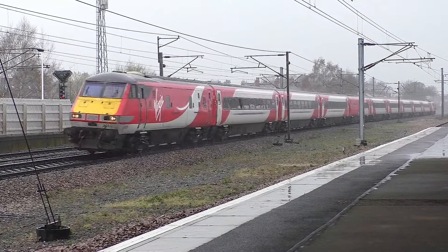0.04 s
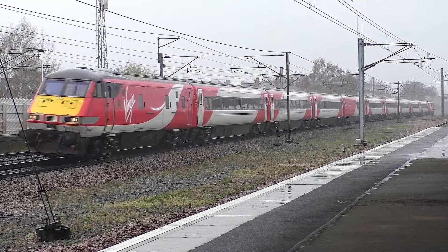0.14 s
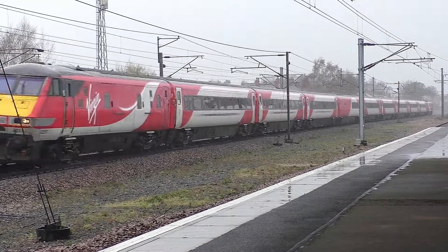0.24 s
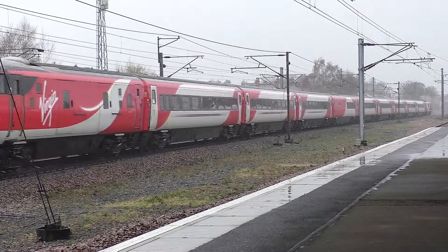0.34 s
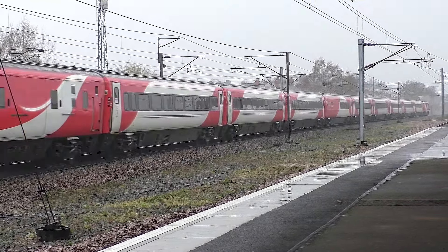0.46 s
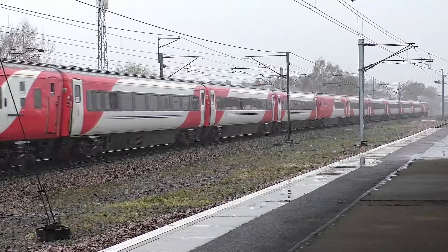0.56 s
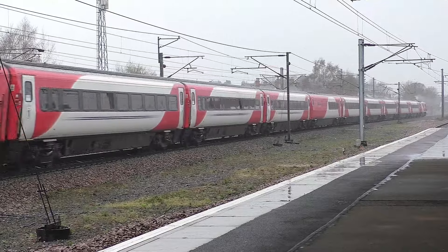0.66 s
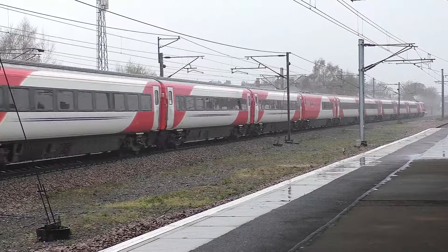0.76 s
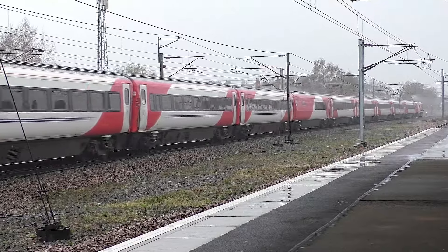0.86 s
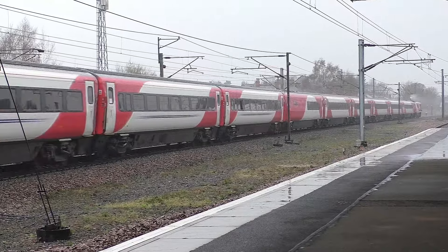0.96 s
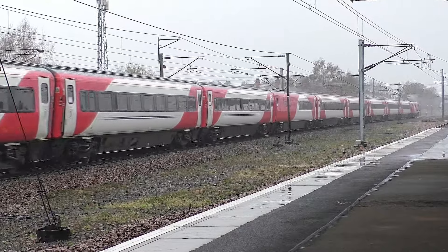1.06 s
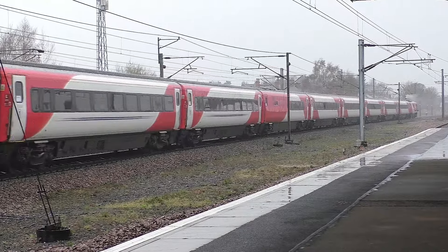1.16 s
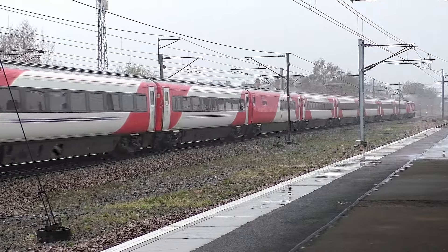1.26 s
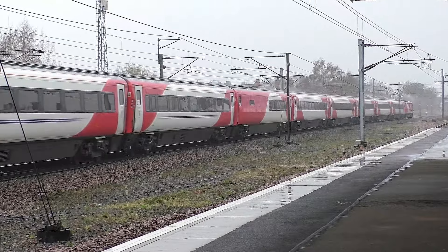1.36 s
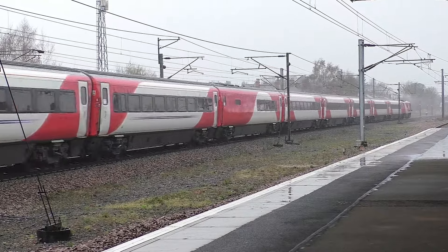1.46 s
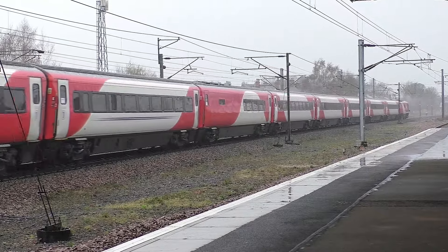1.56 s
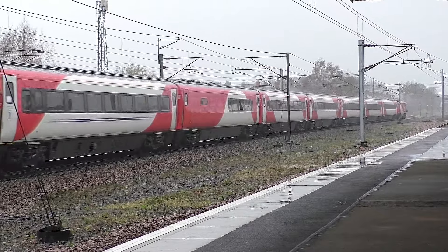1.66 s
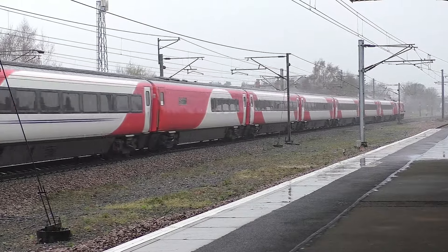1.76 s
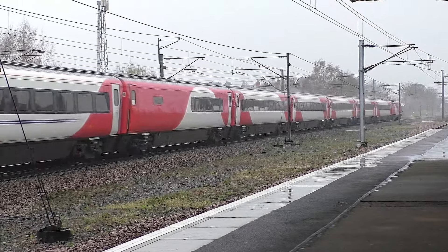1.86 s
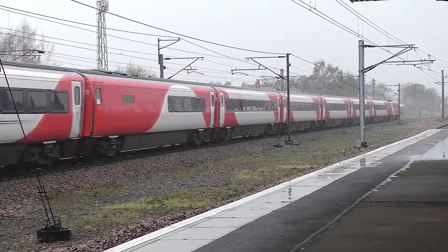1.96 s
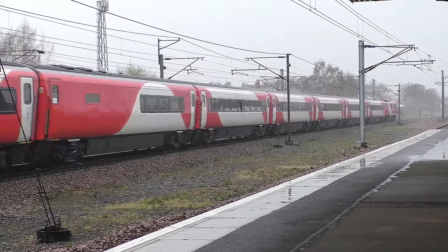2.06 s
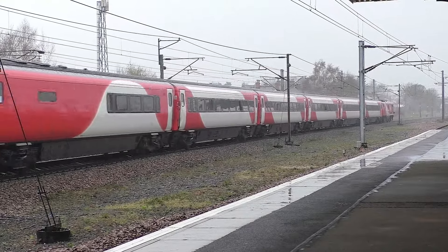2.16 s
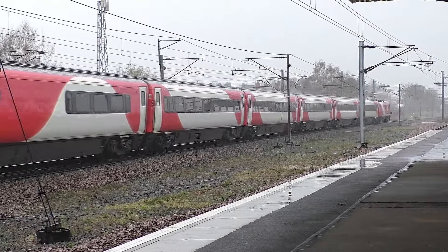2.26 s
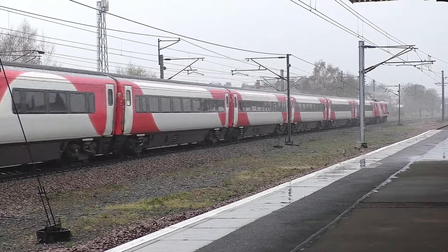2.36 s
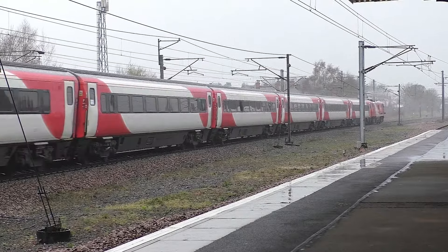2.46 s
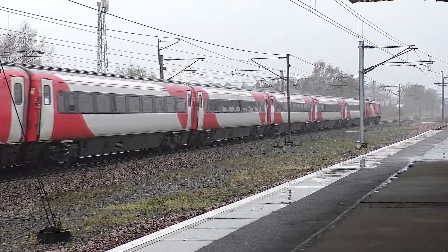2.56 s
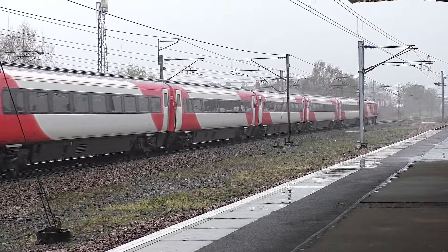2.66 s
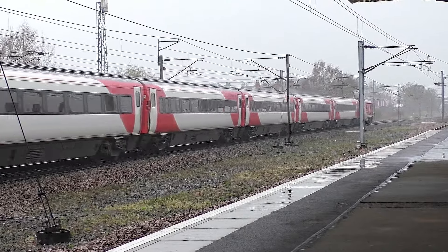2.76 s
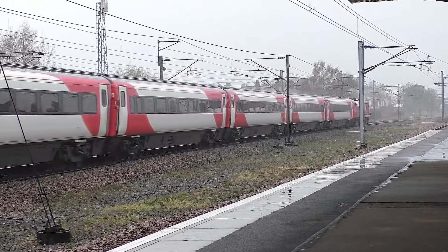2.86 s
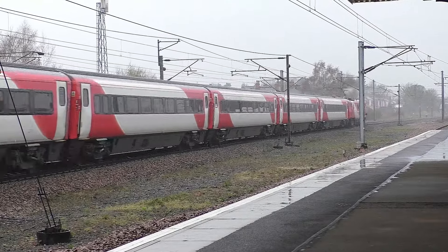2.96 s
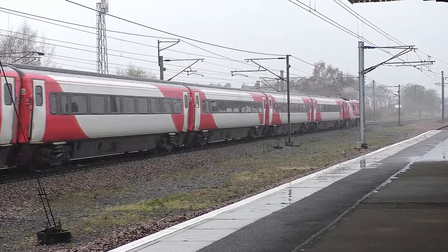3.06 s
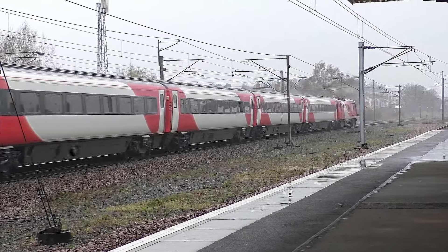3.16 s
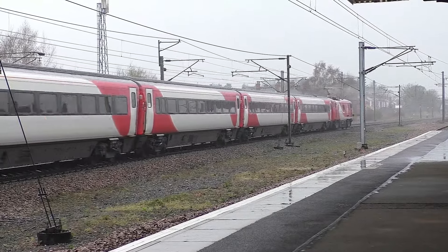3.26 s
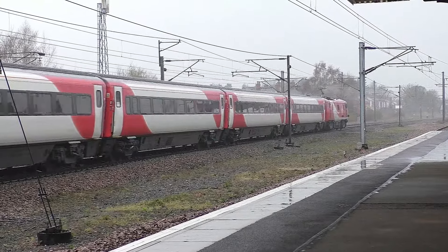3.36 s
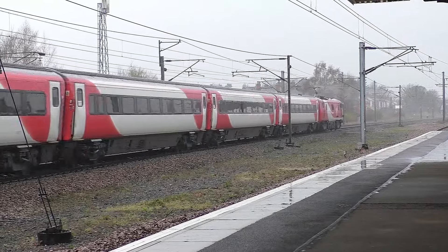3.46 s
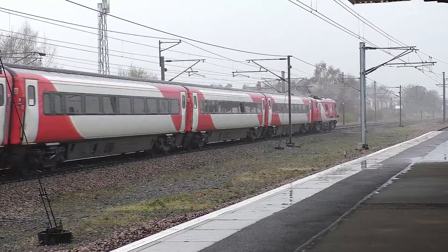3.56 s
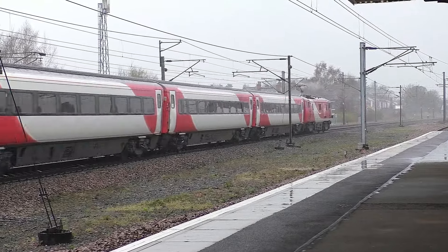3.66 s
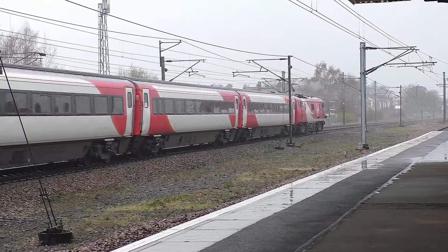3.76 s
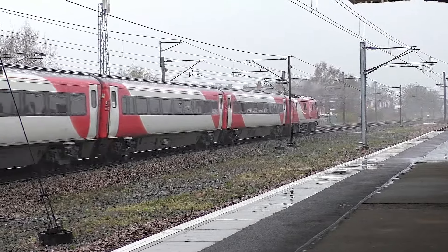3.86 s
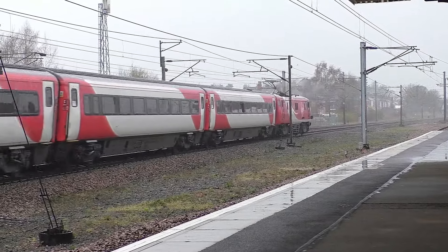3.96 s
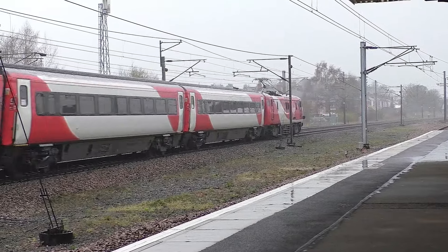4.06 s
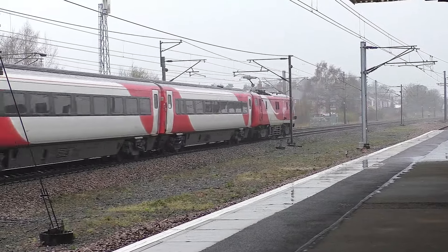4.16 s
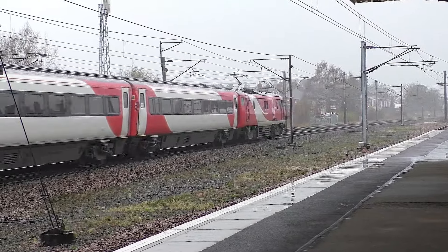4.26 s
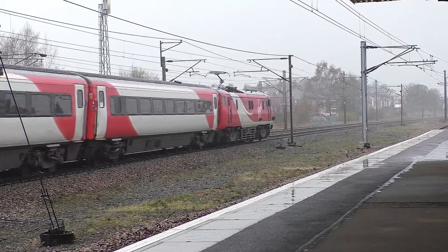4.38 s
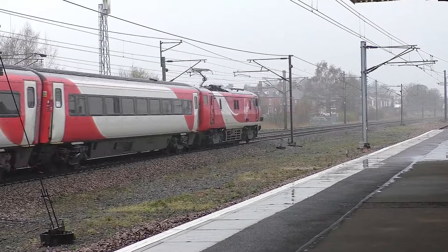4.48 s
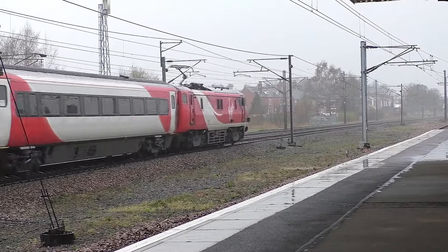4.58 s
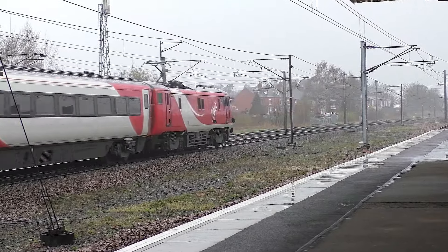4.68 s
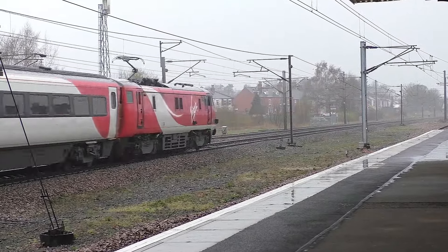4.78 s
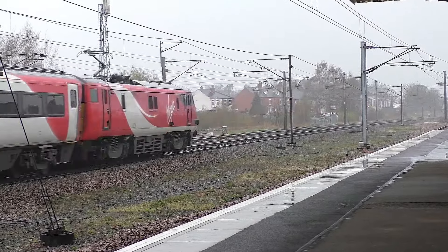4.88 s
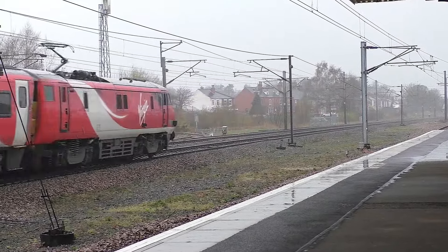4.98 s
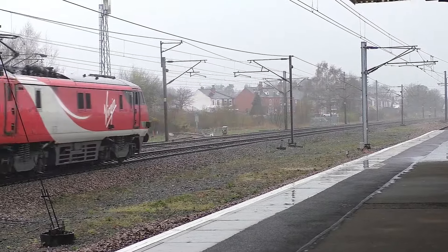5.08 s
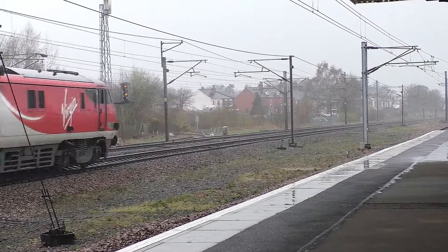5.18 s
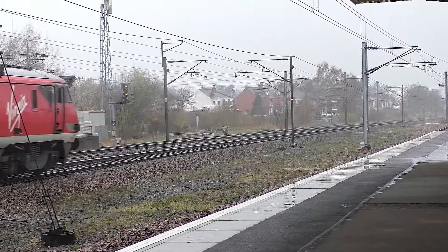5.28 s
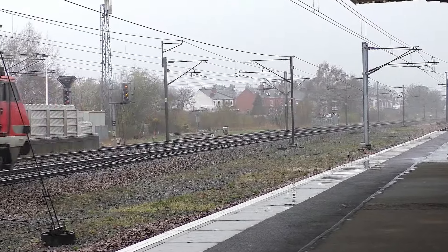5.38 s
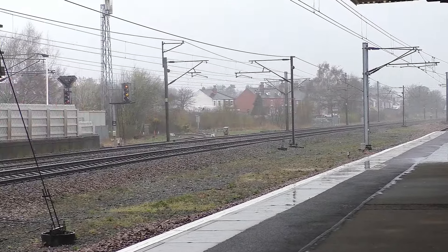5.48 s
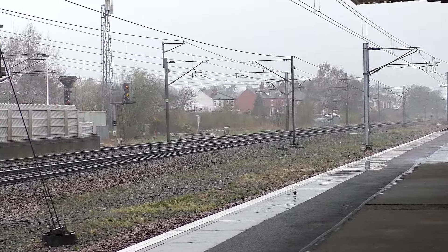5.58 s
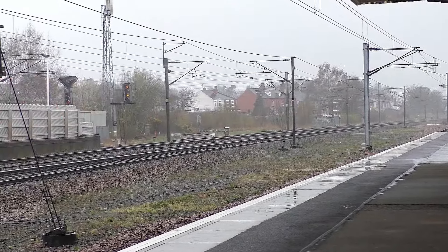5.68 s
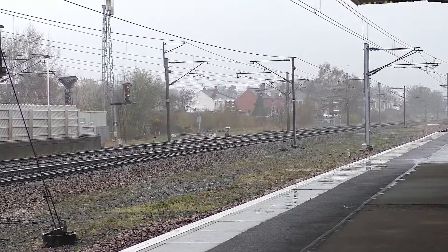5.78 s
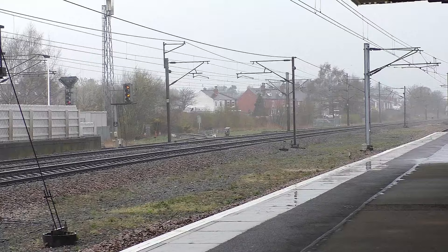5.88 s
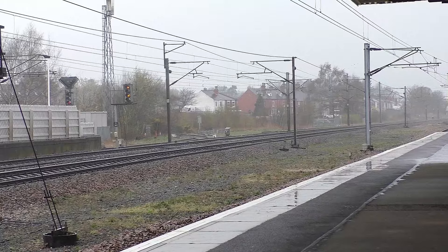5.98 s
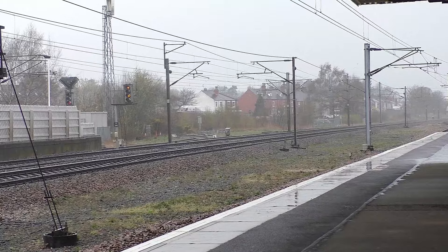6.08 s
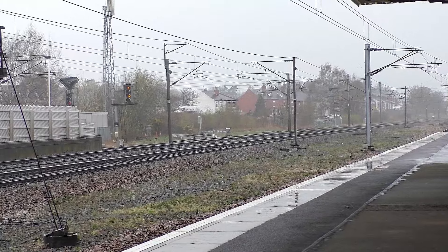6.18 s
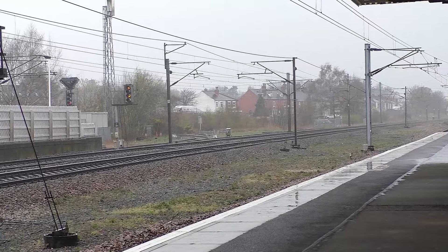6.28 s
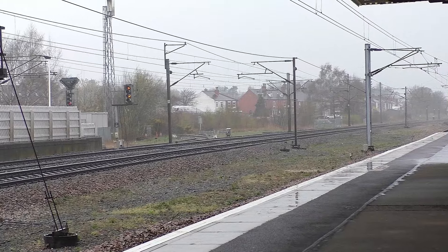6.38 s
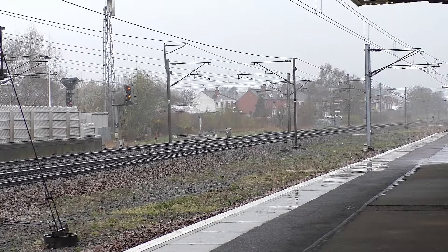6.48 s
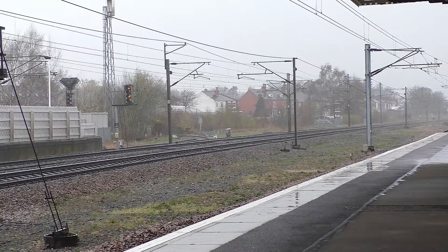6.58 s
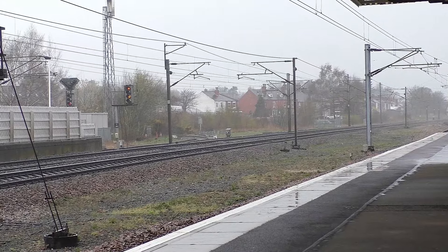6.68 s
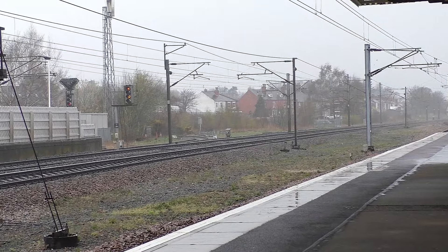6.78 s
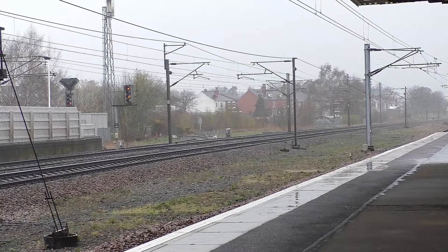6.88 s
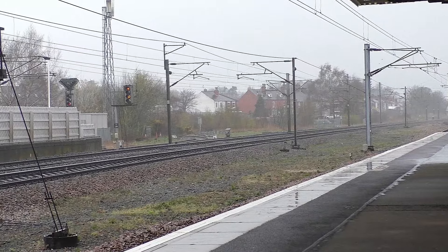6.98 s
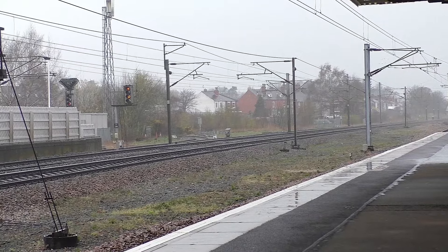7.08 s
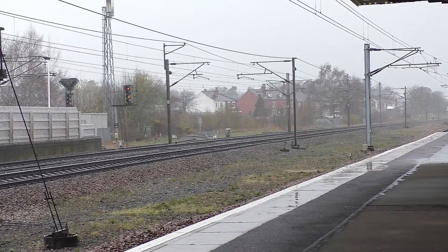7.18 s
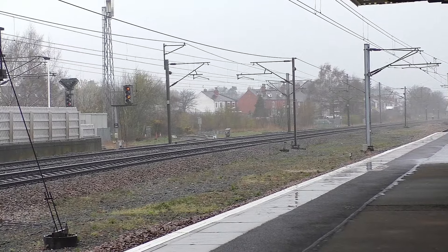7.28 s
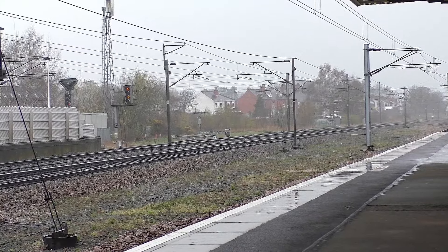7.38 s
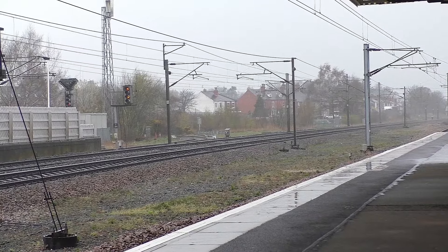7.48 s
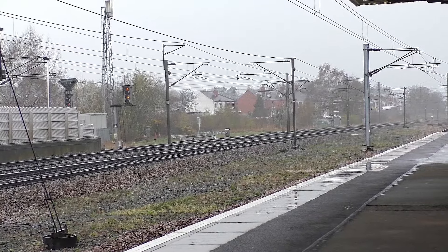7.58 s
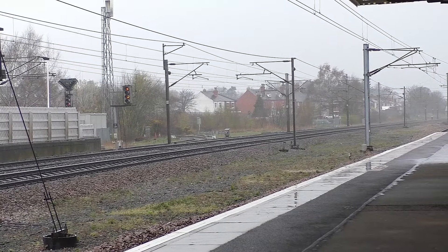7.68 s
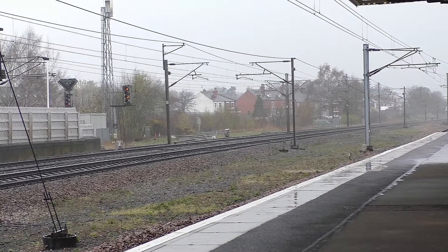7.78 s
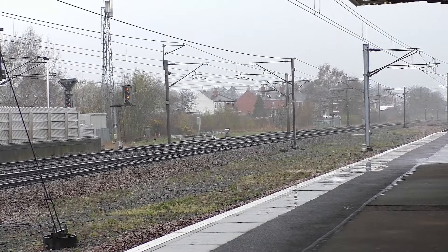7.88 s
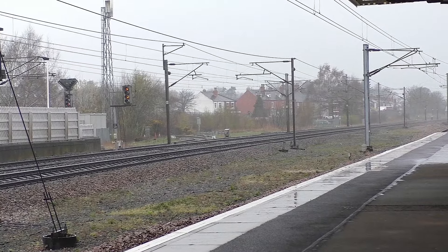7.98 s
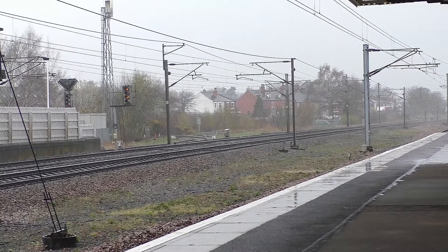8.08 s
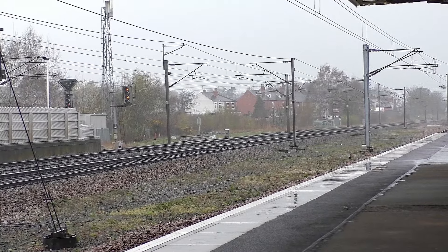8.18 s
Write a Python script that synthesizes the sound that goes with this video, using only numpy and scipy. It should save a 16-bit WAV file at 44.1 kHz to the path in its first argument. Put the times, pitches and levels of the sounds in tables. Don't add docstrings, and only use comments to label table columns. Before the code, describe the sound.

Outdoors at a rainy station, an express passes about twenty metres from a small camera with two close microphones. Rising hum and whine swell within a second into a dense, flickering roar with wet hiss. Uneven waves of ringing wheels sweep by, each sliding downward. After more than five seconds the rear locomotive goes by, a short scratchy squeak sounds above it, and the noise falls to a receding hum and faint microphone hiss.

```python
import sys
import numpy as np
from scipy import signal
from scipy.fft import rfft, irfft, next_fast_len
from scipy.io import wavfile
from scipy.ndimage import uniform_filter1d

SR = 44100
rng = np.random.default_rng(int(sys.argv[2]) if len(sys.argv) > 2 else 0)


def decibels_to_gain(level_db):
    exponent = np.asarray(level_db, float) / 20
    return 10 ** exponent


def persist_wave(psi):
    counts = np.round(np.clip(psi, -1, 1) * 32767).astype(np.int16)
    wavfile.write(sys.argv[1], SR, np.atleast_2d(counts).T)


N = 363455
T = np.arange(N) / SR
M = next_fast_len(N + N // 3)
HZ = np.fft.rfftfreq(M, 1 / SR) + 1e-3
SPEED_M_S, TRACK_M, SOUND_M_S = 46., 21., 343.

# from_wheels_db, from_air_db, locomotive_db, far_ahead_db, far_behind_db
UNDERFRAME = [
    (-67, -47.5, -61, 0, -10),
    (-39, -27.5, -26, -1.5, -6),
    (-26.5, -24.5, -19, 1.55, -5.5),
]


def read(table, column=1):
    rows = np.array(table, float)
    return np.interp(np.log(HZ), np.log(np.maximum(rows[:, 0], 1)), rows[:, column])


def unit(shape):
    return shape / np.sqrt(np.sum(shape ** 2))


def noise(shape):
    real, imaginary = rng.standard_normal((2, 2, len(HZ)))
    return irfft((real + 1j * imaginary) * shape, M) * M / 2


def mode(hz, width_hz):
    return unit(1 / (1 + np.abs(2 * (HZ - hz) / width_hz) ** 3))


def walk(rate_hz):
    hold = int(SR / rate_hz)
    held = np.repeat(rng.standard_normal(400), hold)[:N]
    return 0.77 * uniform_filter1d(uniform_filter1d(held, hold), hold)


def along_track(abreast_s, t):
    since = t - abreast_s
    slow = 1 - (SPEED_M_S / SOUND_M_S) ** 2
    sent = (since - np.sqrt(since ** 2 * (1 - slow) + slow * (TRACK_M / SOUND_M_S) ** 2)) / slow
    near = TRACK_M / np.hypot(SPEED_M_S * sent, TRACK_M)
    return sent, near, SPEED_M_S * sent * near / TRACK_M


def train_gain(layers):
    # abreast_s, wheel_roughness_db, body_air_db
    vehicles = [(.61, -3.5, 3.5), (1.22, 0.3, -3), (1.679, 2.3, -8), (2.14, 0.7, -8), (2.65, -3.5, -8),
                (3.11, 3, -7), (3.59, -1.5, -19), (4.09, 0.3, -4), (4.43, 1.1, -12.5), (5.029, .4, -4.5),
                (5.45, -2.5, -7)]
    loco_s, beam = 5.787, 1.09
    wheel_db, air_db, loco_db, ahead_db, behind_db = np.array(layers).T[:, :, None]
    sources = [(s, decibels_to_gain(wheel_db + rough) ** 2 + decibels_to_gain(air_db + air) ** 2) for s, rough, air in vehicles]
    sources.append((loco_s, decibels_to_gain(loco_db) ** 2))
    coarse = T[::64]
    power = 0
    for abreast_s, strength in sources:
        _, near, bearing = along_track(abreast_s, coarse)
        far = decibels_to_gain(ahead_db * (1.5 - bearing) + behind_db * (1 + bearing))
        power = power + strength * near ** 2 * (near ** (2 * beam) + far)
    return [np.interp(T, coarse, np.sqrt(p)) for p in power]


def rush(layers, centres_hz, first, colour, flicker_db, rate_hz):
    out = 0
    for k, gain in enumerate(train_gain(layers)):
        share = np.interp(np.log(HZ), np.log(centres_hz), np.arange(len(centres_hz)) == k + first)
        shape = decibels_to_gain(read(colour)) * np.sin(np.pi / 2 * share)
        region = noise(unit(shape))[:, :N]
        out = out + region * gain * decibels_to_gain(flicker_db * walk(rate_hz))
    return out


def passing(pair, abreast_s, sideways, ahead_db, reach_s=np.inf):
    heard = np.abs(T - abreast_s) < reach_s
    sent, near, bearing = along_track(abreast_s, T[heard])
    gain = near ** (1 + sideways) * decibels_to_gain(-ahead_db * bearing)
    place = (sent - sent[0]) * SR
    out = np.zeros((2, N))
    out[:, heard] = gain * np.array([np.interp(place, np.arange(M), x) for x in pair])
    return out


def underframe_roar():
    centres = [100, 300, 760, 1300]
    # hz, density_db_per_hz
    lows = [(15, -77), (25, -32), (147, -22.5), (269, -13), (409, -8), (445, -8), (690, 1), (803, 2.5),
            (1310, -2), (1400, -9), (1820, -39), (3080, -120)]
    return rush(UNDERFRAME, centres, first=0, colour=lows, flicker_db=1.58, rate_hz=9.)


def sleepers():
    return noise(mode(84, 10.0))[:, :N] * train_gain(UNDERFRAME)[0] * decibels_to_gain(-7)


def rush_and_spray():
    centres = [760, 1300, 2300, 3200, 5500, 12000]
    # hz, density_db_per_hz
    highs = [(500, -25), (807, 2), (1340, -1), (1630, -1), (2000, -6), (2300, -5), (3200, -11), (4200, -17),
             (5500, -19), (7500, -25), (9500, -29), (12300, -22.5), (14200, -32.5), (15700, -36)]
    # from_wheels_db, from_air_db, locomotive_db, far_ahead_db, far_behind_db
    layers = [
        (-29, -29, -21, 1, -4.5),
        (-19.5, -49, -22, -4, -15),
        (-25.5, -30, -30, -8.5, -14),
        (-30, -35, -27, -2.5, -20.5),
        (-45.5, -46, -44.5, -9, -23),
    ]
    return rush(layers, centres, first=1, colour=highs, flicker_db=1.5, rate_hz=12.)


def drones():
    # abreast_s, rest_hz, width_hz, level_db, ahead_over_abreast_db
    carrying = [(0.899, 523, 200, -26.5, 16.5), (5.4, 1700, 70, -42.5, -11), (5.4, 2230, 220, -40.5, -16),
                (5.4, 2780, 300, -41, -10), (5.5, 8200, 450, -66, -20), (5.75, 540, 248, -25, -0.5),
                (5.6, 934, 120, -26.5, -1.5)]
    # abreast_s, rest_hz, width_hz, level_db
    whines = [(1.4, 1630, 88, -29.5), (1.25, 2246, 230, -30), (1.45, 2740, 130, -35)]
    # abreast_s, rest_hz, width_hz, level_db
    rough_rail = (3, 860, 130, -26.5)
    notes = [(*row, .3) for row in carrying]
    notes += [(*row, 18, .8) for row in whines]
    notes.append((*rough_rail, .1, 8))
    out = 0
    for abreast_s, hz, width_hz, db, ahead_db, beam in notes:
        out = out + decibels_to_gain(db) * passing(noise(mode(hz, width_hz)), abreast_s, beam, ahead_db)
    return out


def wheels():
    # rest_hz, width_hz
    mode_groups = [
        [(1670, 180)],
        [(2290, 190)],
        [(3000, 260)],
        [(4780, 190), (5480, 240)],
    ]
    # abreast_s, web_db, rim_db, tread_db, upper_pair_db
    bogies = [(0.749, -47, -45, -39, -40), (1.3, -35, -23, -29, -42), (1.751, -40, -25.5, -30, -42),
              (2.3, -21.5, -25, -35, -37), (2.751, -24, -25.5, -34, -35), (3.15, -20.5, -19, -23.5, -31.5),
              (3.7, -22.5, -24, -31, -33.5), (4.3, -23.5, -31, -32, -33.5), (4.701, -30, -31, -30, -37),
              (5.15, -22, -24, -31, -36), (5.449, -23.5, -47, -40, -38)]
    beams = [4.9, 2.8, 4.2, 8.4]
    out = 0
    for k, group in enumerate(mode_groups):
        ring = noise(sum(mode(hz, width_hz) for hz, width_hz in group))
        for abreast_s, *levels_db in bogies:
            own = np.roll(ring, rng.integers(M), axis=1)
            out = out + decibels_to_gain(levels_db[k]) * passing(own, abreast_s, beams[k], 0, reach_s=1.5)
    return out


def pantograph():
    # time_s, pitch_hz, level_db
    squeak = [
        (5.735, 7430, -60),
        (5.752, 7350, -30),
        (5.77, 7280, -32),
        (5.795, 6980, -23),
        (5.825, 7050, -55),
    ]
    s, hz, db = np.transpose(squeak)
    flutter = noise(mode(30., 120.0))[:, :N]
    tone = np.sin(2 * np.pi * np.cumsum(np.interp(T, s, hz)) / SR)
    return np.sqrt(2) * tone * (1.1 + 0.87 * flutter) * decibels_to_gain(np.interp(T, s, db, -120, -120))


def ports(pair, blend_s=0.14):
    # hz, ahead_rad, abreast_rad, behind_rad
    lead = [(60, 0, 0, 0), (340, .1, 0, 0), (1290, .6, 1, .45), (1890, .85, .8, .4), (2700, .5, 0, .35),
            (4100, .7, .2, .3), (6200, 1.45, 1.2, .45), (7700, 2.2, 1.1, 1), (9200, 3.2, 3.2, 2.9),
            (11500, 3.3, 3.4, 3), (13400, 3.8, 6.3, 6)]
    # hz, ahead_db, abreast_db, behind_db
    tilt = [(110, -3, -1.5, -2.2), (380, -2.5, -3, -0.5), (704, -5, -3.5, -3.5), (1290, -4, -0.5, -0.5),
            (2380, -2.1, 0.3, -1.5), (4400, -1.5, -1.4, -2), (15000, -2, 1.3, 2)]
    # hz, ahead, abreast, behind
    likeness = [(60, .97, 0.97, .8), (300, 0.96, 0.93, 0.81), (700, 1, 0.91, 0.87),
                (1400, 0.92, 0.39, 0.64), (2460, 0.67, 0.43, 0.62), (3950, 0.69, 0.8, 0.8),
                (5970, 0.33, 0.48, 0.4), (10000, 0.63, 0.37, .4), (14000, 0.27, 0.12, 0.1)]
    turns = [0.68, 6.26]
    a, b = rfft(pair, M)
    ahead = 1 / (1 + np.exp((T - turns[0]) / blend_s))
    behind = 1 / (1 + np.exp(-(T - turns[1]) / blend_s))
    out = 0
    for column, weight in enumerate((ahead, 1 - ahead - behind, behind), start=1):
        alike = np.clip(read(likeness, column), 0, 1)
        mid = a * np.sqrt((1 + alike) / 2)
        side = b * np.sqrt((1 - alike) / 2)
        half = np.exp(.5j * read(lead, column)) * decibels_to_gain(read(tilt, column) / 2)
        left_right = np.array([(mid + side) * half, (mid - side) / half])
        out = out + weight * irfft(left_right, M)[:, :N]
    return out


def scene():
    broadband = underframe_roar() + sleepers() + rush_and_spray()
    return ports(broadband + drones() + wheels() + pantograph())


def band_limit(x):
    return signal.sosfilt(signal.butter(12, 15670, fs=SR, output="sos"), x)


def record(dry):
    hiss = decibels_to_gain(-68) * noise(mode(12000, 7000.))[:, :N]
    rounded = dry / (1 + np.abs(dry) ** 6) ** (1 / 6)
    return band_limit(rounded + hiss)


dry = scene()
out = record(dry)
persist_wave(out)
```